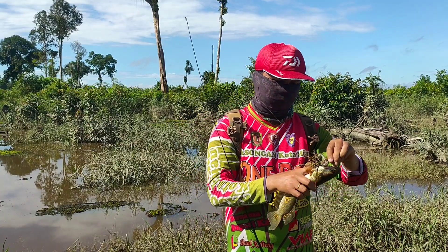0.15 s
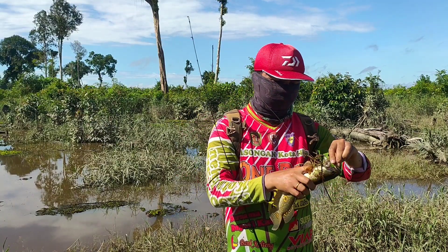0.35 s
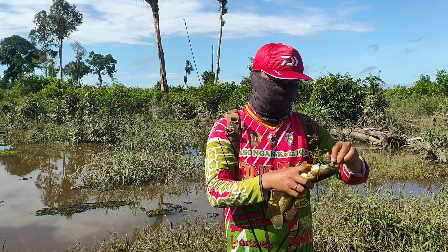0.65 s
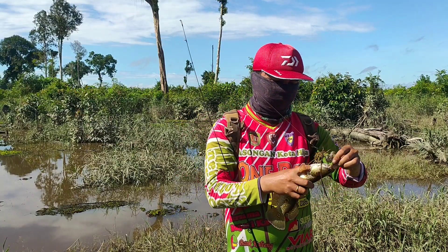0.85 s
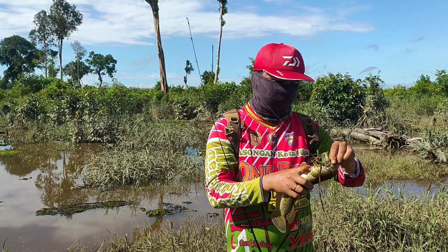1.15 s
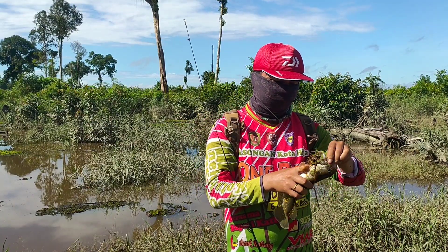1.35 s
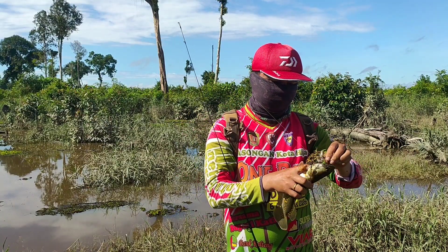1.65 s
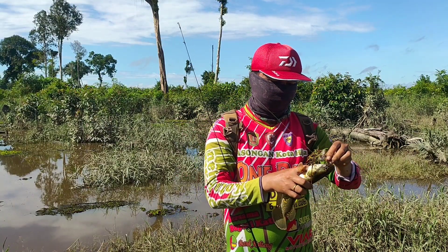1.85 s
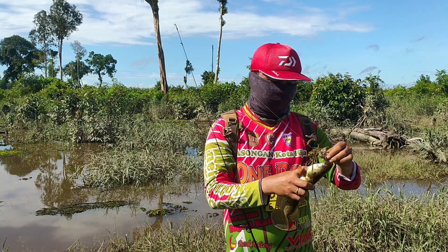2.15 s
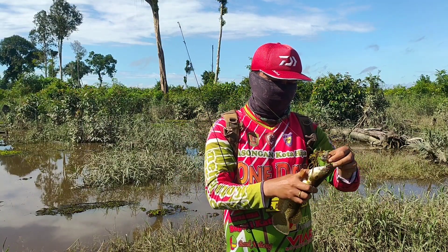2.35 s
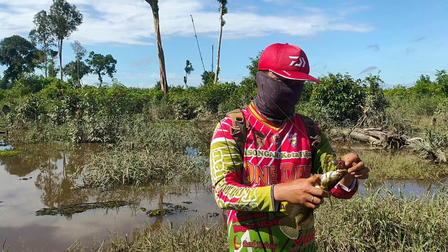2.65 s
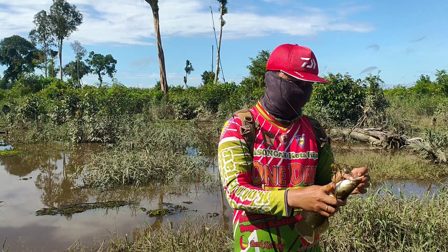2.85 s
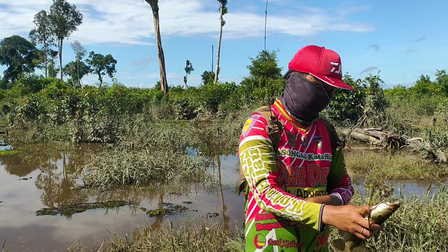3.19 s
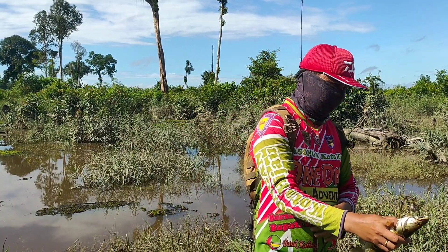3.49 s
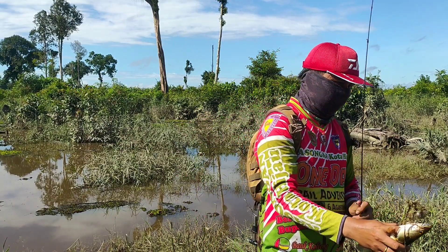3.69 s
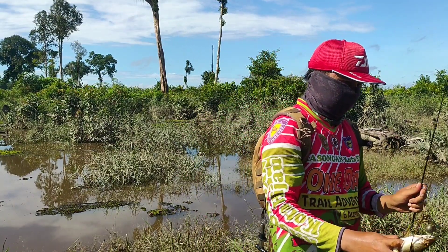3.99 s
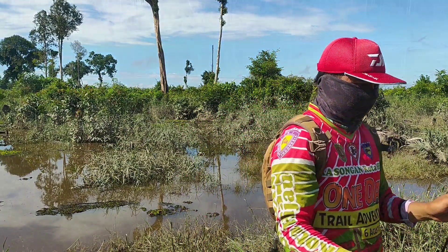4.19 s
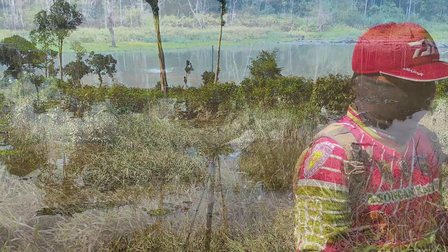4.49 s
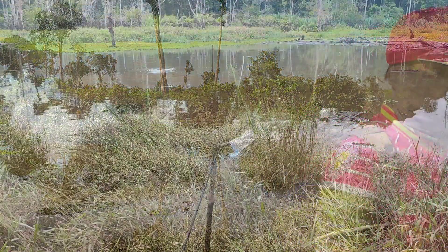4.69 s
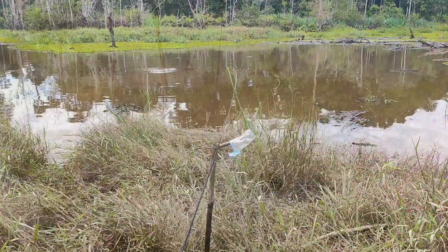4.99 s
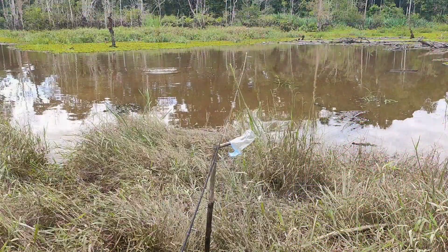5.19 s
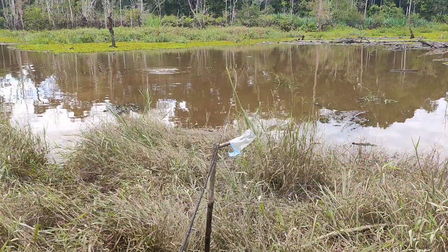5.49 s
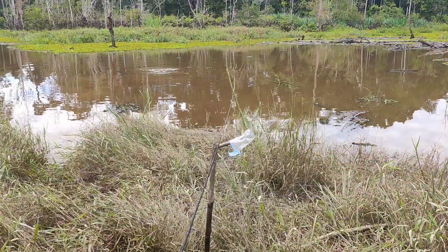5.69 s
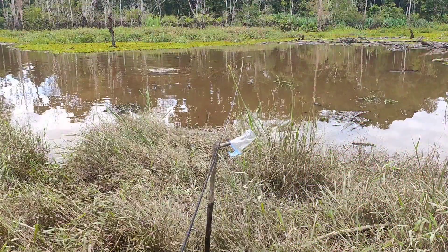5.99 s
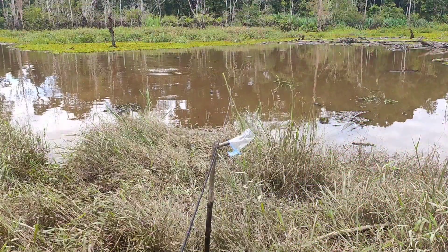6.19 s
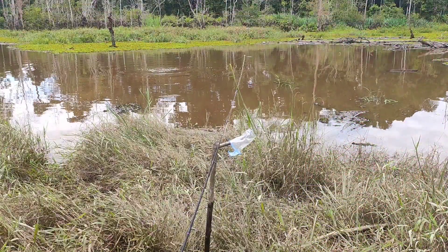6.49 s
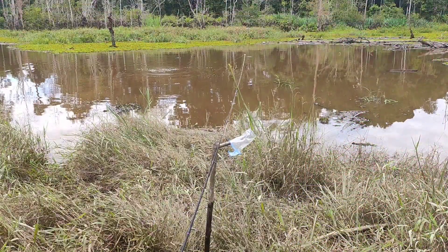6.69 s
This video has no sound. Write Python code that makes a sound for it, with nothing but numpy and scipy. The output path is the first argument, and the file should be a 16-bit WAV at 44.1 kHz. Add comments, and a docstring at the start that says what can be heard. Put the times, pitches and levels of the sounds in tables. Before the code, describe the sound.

A wide outdoor stereo pickup at a pond edge: fast high insect trills, throbbing low machine drone, light wind and soft clothing movement. Far birds whistle, some hoarse. Past the middle, dry grass swishes close by, with a short creak and a cluster of woody knocks and cracks. The rumble weakens, the grass insects give way to pulsing pond crickets, and a bird chips quickly close by as a small motor grows at the end.

```python
"""Swamp edge by day: machinery rumbles in beats while crickets and a katydid, resonant wings driven in strokes,
sing over rustling cloth and leaves; far birds whistle as wavering, partly hoarse tones. Then twigs snap as
decaying knocks and cracks, someone brushes through hissing grass, and a strap creaks by stick and slip.
A near bird then chips in falling tones echoed by water, bank and trunks. Pond crickets replace the grass
singers, and a small engine, firing impulses through a resonant pipe, draws closer."""
import sys
import numpy as np
from scipy import signal
from scipy.fft import rfft, irfft, next_fast_len
from scipy.io import wavfile
from scipy.ndimage import uniform_filter1d, map_coordinates

SR = 44100
rng = np.random.default_rng(int(sys.argv[2]) if len(sys.argv) > 2 else 0)


def store_pcm(level_fs):
    """Save levels as 16-bit WAV."""
    pcm = np.round(np.clip(level_fs, -1, 1) * 32767).astype(np.int16)
    wavfile.write(sys.argv[1], SR, np.atleast_2d(pcm).T)


N = 301864
TIME = np.arange(N) / SR


def amp(db):
    """Level law: decibels to an amplitude ratio."""
    return 10 ** (np.asarray(db) / 20)


def unit(x):
    """Normalization to an rms of 1."""
    return x / np.sqrt(np.mean(x ** 2, axis=-1, keepdims=True) + 1e-20)


def along(points, hz):
    """Interpolation of (Hz, value) points on a logarithmic frequency axis."""
    f, v = np.transpose(points)
    return np.interp(np.log(hz + 1), np.log(f + 1), v)


def spectrum(points):
    """Spectral shaping: a gain for every frequency, from (Hz, dB) points."""
    return lambda hz: amp(along(points, hz))


def levels(rows):
    """Envelope interpolation: one dB curve per column, -120 dB outside the table."""
    s, *cols = np.transpose(rows)
    return [np.interp(TIME, s, c, left=-120, right=-120) for c in cols]


def gains(rows):
    """Envelope interpolation, as amplitude ratios."""
    return [amp(c) for c in levels(rows)]


def wobble(rate):
    """Slow random modulation: a smooth curve with rate knots a second."""
    return map_coordinates(rng.standard_normal(int(N * rate / SR) + 4), [TIME * rate])


def filtered(x, response):
    """Linear filtering: the spectrum of x times a response of frequency."""
    m = next_fast_len(N + SR // 2)
    return irfft(rfft(x, m) * response(np.fft.rfftfreq(m, 1 / SR)), m)[..., :N]


def band(hz, width_hz):
    """Resonance: a steep bell around hz."""
    return lambda f: 1 / (1 + ((f - hz) / width_hz) ** 2) ** 2


def noise(response, alike, patchy_db=0):
    """Interchannel coherence: stereo noise of rms 1 with a set left-right likeness and random patches."""
    z = signal.stft(rng.standard_normal((2, N)), nperseg=512)[2]
    field = rng.standard_normal(z.shape[1:])
    field = uniform_filter1d(uniform_filter1d(field, 6, 0), 10, 1)
    patches = amp(patchy_db * field / field.std())
    mid, side = filtered(signal.istft(z * patches, nperseg=512)[1][:, :N], response)
    turn = np.arccos(np.clip(alike, -1, 1)) / 2
    mid, side = np.cos(turn) * mid, np.sin(turn) * side
    return unit(np.array([mid + side, mid - side]))


def panned(db):
    """Interchannel level difference: left over right in dB."""
    return amp([[db / 2], [-db / 2]])


def tone(hz, lead=0):
    """Phase integration: a sine that follows a frequency curve, lead radians ahead."""
    return np.sin(2 * np.pi * np.cumsum(hz) / SR + lead)


RISE_DB_PER_S, SAG_DB_PER_S, FALL_DB_PER_S = 219, 3.5, 287


def stroke(start, length, edge=1):
    """Gesture envelope: exponential rise, slow sag and fall; edge steepens the rise and fall."""
    since = TIME - start
    rise_db = edge * RISE_DB_PER_S * np.minimum(since, 0)
    sag_db = SAG_DB_PER_S * np.clip(since, 0, length)
    fall_db = edge * FALL_DB_PER_S * np.maximum(since - length, 0)
    return amp(rise_db - sag_db - fall_db)


# Decay of echoes among the trunks. Each row: frequency in Hz, 60 dB decay time in seconds.
TREE_DECAY = [(500, 0.11), (1100, 0.3), (1500, 0.42), (2500, 0.61), (6000, 0.41), (12000, 0.012)]


def trees(x, openness=1):
    """Diffuse reverberation: trunk echoes build up, then decay by frequency, faster in open ground."""
    hz, t, z = signal.stft(rng.standard_normal((2, SR // 2)), SR, nperseg=256)
    build_up = 1 - 0.39 * np.exp(-t / 0.027)
    decay = amp(-60 * openness * t / along(TREE_DECAY, hz)[:, None])
    tail = signal.istft(z * build_up * decay, SR, nperseg=256)[1]
    delayed = np.pad(x, (200, 0))[None]  # delay in samples
    return signal.fftconvolve(delayed, tail / np.linalg.norm(tail[0]), axes=1)[:, :N]


# Spectrum of a faint steady hiss. Each row: frequency in Hz, relative density in dB per Hz.
QUIET_SPECTRUM = [(200, -43.5), (500, 15.5), (1000, 13), (3500, -29), (6000, -10), (10000, -23),
                  (12000, 8.5), (14000, 8.5), (15500, 10), (17000, -0.5)]


def quiet_hiss():
    """Stationary noise: a faint, patchy hiss independent at left and right."""
    return amp(-81.5) * noise(spectrum(QUIET_SPECTRUM), alike=0, patchy_db=8.5)


# Far machinery. Each row: time in seconds, drone level in dB, body level in dB, hum level in dB,
# strength of the second, lower drone from 0 to 1.
MACHINERY_LEVELS = [(0, -45, -36, -51.5, 0.25), (.7, -44.5, -46, -54, 0.47), (1.0, -48, -43, -51, 0.16),
                    (1.3, -43.5, -46, -58, 0.066), (1.85, -49, -44.5, -51, 0.17),
                    (2.05, -44, -40, -49.5, 0.26), (2.7, -48.5, -43, -50.5, 0.22),
                    (3.0, -44, -44, -55, 0.12), (3.55, -45.5, -50.5, -63, 0.21),
                    (3.8, -43, -41.5, -49, 0.27), (4.2, -39.5, -41, -55, 0.49), (4.6, -49, -46.5, -54, 0.6),
                    (5.1, -50.5, -54, -67.5, 0.84), (5.4, -50, -58.5, -82, 0.96),
                    (5.75, -55, -61, -89, 0.81), (6.1, -53.5, -56, -81, 0.76),
                    (6.84, -53.5, -64.5, -77.5, 0.91)]
# Spectrum of the low body. Each row: frequency in Hz, relative density in dB per Hz.
BODY_SPECTRUM = [(53, -13), (90, 2), (119, -0.5), (173, -6), (207, -22.5), (226, -12.5), (261, -17),
                 (290, -23), (450, -46), (580, -50.5), (990, -120)]
BEAT_HZ, BEAT_NULL_S = 5.5, 5.01  # beat rate; a moment at which the drones oppose each other


def rumble():
    """Beating: two wavering drones interfere, over broad low noise and a narrow-band hum."""
    drone_db, body_db, hum_db, second = levels(MACHINERY_LEVELS)
    second = np.clip(second, 0, 1)
    direction = 0.38 * wobble(2.1) * [[1], [-1]]  # left-right phase drifts
    phase = 2 * np.pi * np.cumsum(79.3 + 3 * wobble(12)) / SR + direction
    beat = 2 * np.pi * BEAT_HZ * (TIME - BEAT_NULL_S)
    pair = np.sin(phase) - second * np.sin(phase - beat)
    pair = pair * np.abs(1 - second * np.cos(beat)) ** 0.24  # the beats peak sharply
    drone = unit(pair * amp(3.6 * wobble(11)) + 0.075 * noise(band(75.7, 18), alike=0.065))
    out = amp(drone_db) * drone
    out += amp(body_db) * noise(spectrum(BODY_SPECTRUM), alike=0.94, patchy_db=1.5)
    return out + amp(hum_db) * noise(band(200.9, 12.0), alike=0.74)


WIND_DB = -60


def wind():
    """Turbulence: gusty low noise, nearly incoherent between left and right."""
    return amp(WIND_DB + 6.2 * wobble(2.84)) * noise(band(36, 31), alike=0.056)


# Low knocks. Each row: start in seconds, level in dB, frequency in Hz, left over right in dB.
LOW_KNOCKS = [(0.92, -40, 58.3, 13), (1.887, -29, 71, 11), (1.98, -28.5, 95, 9), (3.65, -25.5, 79.4, -14.5)]


def thumps():
    """Damped impact: each low knock is one push and its rebound."""
    out, t = np.zeros((2, N)), TIME[:SR // 20]
    for s, db, hz, pan_db in LOW_KNOCKS:
        push = np.sin(2 * np.pi * hz * t) * np.exp(-((t * hz - .6) / 0.62) ** 2)
        out[:, round(s * SR):][:, :len(t)] += amp(db) * push * panned(pan_db)
    return out


# Far birds. Each row: start in seconds, end in seconds, start frequency in Hz, end frequency in Hz,
# relative level in dB, random frequency deviation (hoarseness) in Hz.
FAR_WHISTLES = [(.74, 1.4, 4570, 4580, -76, 70), (1.0, 1.17, 4620, 4580, -80, 60),
                (1.18, 1.33, 4400, 4200, -81, 200), (.878, .925, 2050, 1900, -67, 70),
                (1.152, 1.192, 4900, 2300, -63, 110), (1.224, 1.233, 3900, 3150, -67, 20),
                (.645, .665, 2200, 2150, -78, 40), (1.7, 2.0, 2780, 2720, -73, 90),
                (1.51, 1.6, 3000, 2980, -65, 40), (1.52, 1.72, 2880, 2700, -64, 60),
                (1.71, 1.83, 3450, 3050, -73, 120), (1.79, 1.99, 2930, 2880, -61, 25),
                (1.99, 2.12, 2900, 2950, -68, 40), (1.74, 2.08, 3230, 3200, -68, 200),
                (2.05, 2.55, 3330, 3300, -67, 280), (2.15, 2.6, 2950, 2850, -70, 200),
                (2.01, 2.35, 2640, 2640, -59, 35), (2.12, 2.175, 3100, 2700, -61, 30),
                (2.44, 2.6, 2480, 2450, -72, 40), (2.315, 2.395, 3680, 2470, -58, 20),
                (2.385, 2.44, 2460, 2450, -61, 20), (2.52, 2.585, 2350, 1950, -68, 60),
                (2.15, 2.55, 4200, 4900, -82, 150), (1.75, 2.05, 5050, 5350, -83, 150),
                (1.5, 1.7, 4100, 4600, -83, 150), (2.08, 2.12, 1100, 1080, -73, 20),
                (2.33, 2.42, 1090, 1080, -71, 15), (2.63, 2.74, 1090, 1080, -77, 25),
                (2.88, 2.895, 2700, 2000, -68, 40), (2.896, 2.901, 5800, 3600, -66, 200),
                (3.012, 3.022, 2500, 2200, -64, 40), (3.443, 3.485, 2300, 2310, -61, 30),
                (3.49, 3.522, 2320, 2340, -63, 30), (3.628, 3.65, 2120, 2330, -62, 20),
                (.15, .55, 3850, 3750, -84, 160), (.62, .97, 3880, 3800, -85, 120),
                (.25, .62, 5400, 5100, -84, 170), (.99, 1.12, 3550, 3450, -82, 120),
                (3.82, 3.865, 4800, 4100, -60, 30), (4.783, 4.825, 5450, 4850, -62, 10)]
QUICK_S, QUICK_ECHO_DB = .05, -5  # shorter notes come from nearer and carry less echo
EDGE_S, DRAWN_S = .03, .35  # longest edge of a short note; a longer, drawn note swells slowly


def far_birds():
    """Frequency modulation: unsteady, partly hoarse whistles with a ground reflection and echoes."""
    dry, echoed = np.zeros(N), np.zeros(N)
    for start, end, start_hz, end_hz, db, hoarse_hz in FAR_WHISTLES:
        n = max(round((end - start) * SR), 64)
        i = round(start * SR)
        hz = np.geomspace(start_hz, end_hz, n) + hoarse_hz * wobble(150)[:n]
        taper = min(2 / 3, 2 * EDGE_S * SR / n) if n < DRAWN_S * SR else .8  # share of the note
        note = amp(db + 8 + 2 * wobble(40)[:n]) * signal.windows.tukey(n, taper) * tone(hz)
        dry[i:i + n] += note
        echoed[i:i + n] += note * amp(QUICK_ECHO_DB if end - start < QUICK_S else 0)
    direct = dry + amp(-9) * np.roll(dry, round(.0018 * SR))  # ground bounce
    return amp(-3) * direct * panned(1) + amp(-4) * trees(echoed, openness=1.3)


# Spectra of cloth, leaves, stalks and blades. Each row: frequency in Hz, relative density in dB per Hz.
CLOTH_SPECTRUM = [(250, -5.5), (400, -6.5), (600, -5), (900, -8.5), (1400, -59)]
LEAF_SPECTRUM = [(600, -34), (1000, 4), (1300, 2.5), (1800, 2), (2600, -0.5), (3300, -65)]
STALK_SPECTRUM = [(1800, -13), (2700, 8.5), (3200, 9.5), (4000, -0.5), (5200, 7.5), (6000, 9.5),
                  (7000, -96)]
BLADE_SPECTRUM = [(3500, -50), (5000, 4), (6500, 17), (8500, 29), (10500, 28), (13000, 23), (15000, 29.5),
                  (16500, -56)]
# Soft underlying rustle. Each row: time in seconds, cloth level in dB.
STIR_LEVELS = [(0, -60), (.3, -71), (.7, -78), (1.35, -80), (1.6, -69.5), (1.82, -83), (1.95, -61),
               (2.35, -64), (2.6, -75), (3, -72), (3.55, -83.5), (5.4, -60.5), (5.62, -100), (5.9, -73.5),
               (6.3, -79.5), (6.84, -68.5)]
STIR_LEAVES_DB, STIR_STALKS_DB = -0.5, -76.5  # leaves over the cloth; steady stalks
# Brushes through the grass. Each row: start in seconds, length in seconds, then the starting levels
# of blades, cloth, leaves and stalks in dB.
GRASS_BRUSHES = [(3.362, 0.17, -57.5, -72.5, -71, -60.5), (3.703, 0.1, -48, -53.5, -52.5, -50.5),
                 (3.841, 0.18, -44.5, -48.5, -49, -48.5), (4.064, 0.14, -47, -53, -51.5, -51.5),
                 (4.272, 0.071, -51.5, -54, -54.5, -47.5), (4.374, 0.23, -51.5, -55.5, -55, -55),
                 (4.453, 0.034, -75, -56, -50.5, -57), (4.625, 0.15, -61, -64.5, -65, -58),
                 (4.871, 0.24, -50.5, -53, -57.5, -52), (5.25, 0.31, -50, -120, -98, -57.5),
                 (5.593, 0.14, -64, -76, -75, -69), (5.892, 0.096, -54.5, -102, -97, -76),
                 (6.096, 0.024, -43, -100, -72, -46.5), (6.208, 0.0067, -61, -73, -87, -69),
                 (6.767, .1, -59, -58, -82, -57)]


def rustle():
    """Friction noise: cloth, leaves and stalks rub softly; grass blades hiss with spiky grains."""
    gestures = (amp(dbs)[:, None] * stroke(s, length) for s, length, *dbs in GRASS_BRUSHES)
    blades, cloth, leaves, stalks = sum(gestures)
    stir, = gains(STIR_LEVELS)
    cloth_noise = noise(spectrum(CLOTH_SPECTRUM), alike=0.34, patchy_db=4.0)
    out = (cloth + stir) * cloth_noise * amp(1.56 * wobble(60))
    leaf_noise = noise(spectrum(LEAF_SPECTRUM), alike=0.082, patchy_db=3.5)
    out += (leaves + stir * amp(STIR_LEAVES_DB)) * leaf_noise * amp(1.2 * wobble(80))
    out += (stalks + amp(STIR_STALKS_DB)) * noise(spectrum(STALK_SPECTRUM), alike=0, patchy_db=3)
    struck = rng.random((2, N)) < 200 / SR  # 200 grains a second on average
    grain_db = np.minimum(4 * rng.exponential(size=(2, N)), 18)
    grains = struck * amp(grain_db) * rng.choice([-1, 1], (2, N))
    grains = unit(filtered(grains, spectrum(BLADE_SPECTRUM)))
    hiss = noise(spectrum(BLADE_SPECTRUM), alike=0, patchy_db=2.5) + 0.38 * grains
    return out + blades * amp(1.1 * wobble(23) + 1.2 * wobble(90)) * hiss


# Twigs and tackle. Each row: time in seconds (2 ms before the onset), knock level in dB,
# knock frequency in Hz, crack level in dB.
TWIG_SNAPS = [(2.894, -65, 355, -74), (4.294, -35, 750, -47), (4.3267, -27, 1390, -31.5),
              (4.348, -49, 353, -45), (4.3735, -29.5, 1260, -28), (4.393, -27.5, 1150, -49),
              (4.419, -45, 396, -54.5), (4.444, -30, 810, -46), (4.461, -32, 455, -49.5),
              (4.483, -35.5, 433, -54), (4.489, -50, 536, -52), (4.503, -33, 520, -51),
              (4.515, -44, 544, -47), (4.634, -47, 560, -34), (4.878, -38, 670, -37),
              (5.047, -35.5, 606, -48), (5.7, -78, 1580, -54), (6.038, -60, 1730, -59),
              (6.06, -61, 1700, -51), (6.115, -62, 1760, -35.5), (6.121, -61, 1800, -31)]


def snaps():
    """Impulsive excitation: a bright noise crack and a duller ringing knock, panned by chance."""
    out, t = np.zeros((2, N)), TIME[:SR // 25]
    for s, knock_db, knock_hz, crack_db in TWIG_SNAPS:
        knock = amp(knock_db - 60 * t / .008) * np.sin(2 * np.pi * knock_hz * t)
        # a bright crack, strongest near 12 kHz
        burst = np.convolve(rng.standard_normal(len(t)), [0.87, 0.41, -1, 0.25], "same")
        crack = amp(crack_db - 60 * t / 0.0032) * burst
        out[:, round((s + .002) * SR):][:, :len(t)] += (knock + crack) * panned(rng.normal(1.5, 3))
    return out


# first slip, first gap, how fast the gaps close up, number of slips
CREAK_S, CREAK_GAP_S, CREAK_QUICKENS_S, CREAK_SLIPS = 3.862, .0105, .00027, 9
CREAK_PEAK_S, CREAK_DB, CREAK_SWELL_S, CREAK_HZ, CREAK_T60_S = 3.912, -35, 0.024, 1050, 0.018


def creak():
    """Stick-slip: a strap under load slips faster and faster; each slip rings a short resonance."""
    out, t = np.zeros(N), TIME[:SR // 25]
    for k in range(CREAK_SLIPS):
        s = CREAK_S + CREAK_GAP_S * k - CREAK_QUICKENS_S * k * k
        off_peak = ((s - CREAK_PEAK_S) / CREAK_SWELL_S) ** 2
        db = CREAK_DB - 6 * off_peak / (1 + off_peak) + rng.normal(0, 1)
        ring = np.sin(2 * np.pi * CREAK_HZ * rng.normal(1, 0.15) * t)
        out[round(s * SR):][:len(t)] += amp(db - 60 * t / CREAK_T60_S) * ring
    return out


# Approach of the engine. Each row: time in seconds, level in dB.
ENGINE_LEVELS = [(5.95, -101), (6.05, -68), (6.3, -61.5), (6.67, -50), (6.84, -52)]
# Exhaust pipe response. Each row: frequency in Hz, relative gain in dB.
PIPE_RESPONSE = [(220, -41), (300, -1.5), (330, -3), (374, 13), (420, -5), (470, 4.5), (510, 9.5),
                 (580, -33), (660, -7), (800, -30), (1200, -43), (3000, -120)]
# from afar mostly one line carries; the full pipe opens up around NEAR_S
DISTANT_HZ, NEAR_S, TURN_S = 411, 6.34, 0.049


def engine():
    """Source and filter: uneven firings through a pipe give fuzzy lines 46.6 Hz apart, on exhaust roar."""
    turns = np.cumsum(46.6 * (1 + 0.0119 * wobble(6))) / SR
    firings = np.diff(np.floor(turns), prepend=0) * amp(3.0 * wobble(40))
    pipe = spectrum(PIPE_RESPONSE)
    near = unit(unit(filtered(firings, pipe)) + .7 * noise(pipe, alike=0.15))
    far_line = unit(filtered(firings, band(DISTANT_HZ, 30)))
    far = unit(far_line + 1.1 * noise(band(DISTANT_HZ, 110), alike=.2))
    share = 1 / (1 + np.exp((NEAR_S - TIME) / TURN_S))
    return gains(ENGINE_LEVELS)[0] * (share * near + (1 - share) * far)


PAIR_S = 3.1765  # reference moment of the stroke count


def insects(singers, loudness):
    """Driven resonance: strokes ring a wing in pulses and phrases; far neighbours merge into a blur."""
    out = np.zeros((2, N))
    for (hz, width_hz, rate, sharp, phrase, depth_db, pan_db, blur), gain in zip(singers, loudness):
        # blurred singers keep time less well
        strokes = 2 + rate * (TIME - PAIR_S) + .6 * blur ** 2 * wobble(3)
        breath = (strokes - .5) * phrase / rate  # a phrase counts its strokes and opens on a pause
        phrase_db = -depth_db * np.cos(2 * np.pi * breath) + 5.5 * blur * wobble(70)
        gate = np.abs(np.sin(np.pi * strokes)) ** abs(sharp) * amp(phrase_db)
        wing_hz = hz + 0.6 * blur * width_hz * wobble(150)
        wing = tone(wing_hz, lead=np.array([[.8], [-.8]]))  # left leads in phase
        neighbours = noise(band(hz, 1.05 * width_hz), alike=0, patchy_db=3) * amp(2 * wobble(40))
        song = (1 - np.clip(blur, 0, 1)) * unit(gate * wing) + blur * neighbours
        out += gain * unit(filtered(song, band(hz, 3 * width_hz))) * panned(pan_db)
    return out


# Pond singers. Each row: wing frequency in Hz, width in Hz, pulses a second, pulse sharpness (exponent),
# phrases a second, phrase swing either way in dB, left over right in dB, blur from 0 to 1.
POND_SINGERS = [(5590, 65, 21.5, .6, 7.6, 2, 0, .25), (6450, 200, 70, 2.5, 17.5, 5, 4, .35),
                (8600, 260, 75, 2, 6, 2, -6, .4), (7850, 160, 90, 1, 6, 2, -3, .4),
                (7800, 900, 120, .4, 3, 2, -3, 1)]
# Steady level in dB, one for each pond singer.
POND_STEADY_LEVELS = [-77.5, -70.5, -69.5, -88, -67.5]
# Louder bouts, one list for each pond singer. Each row: start in seconds, length in seconds, level in dB.
POND_BOUTS = [
    [(5.11, 0.12, -61), (5.3, 0.31, -60), (5.6, 0.31, -66), (5.96, 0.29, -59.5), (6.25, 0.83, -63.5)],
    [(5.82, 0.13, -66.5), (5.985, 0.42, -56), (6.4, 0.094, -70)],
    [(5.29, 0.07, -48), (5.427, 0.018, -50.5), (5.5, 0.016, -54), (5.685, 0.033, -55), (5.862, 0.029, -57),
     (6.036, 0.013, -47.5), (6.1, .06, -52), (6.2, 0.011, -62), (6.4, 0.066, -71), (6.545, 0.013, -69),
     (6.68, 0.029, -53), (6.826, 0.012, -49)],
    [(5.413, 0.023, -57), (5.5, 0.043, -71), (5.96, 0.039, -63), (6.06, .045, -76), (6.21, 0.018, -66),
     (6.308, 0.02, -61)],
    [],
]
POND_START_S, POND_FADE_S = 5.1, .3
BOUT_EDGE = 4  # a bout starts and stops this many times faster than a brush


def pond_insects():
    """Superposition: steady singers fade in, most of which get louder in bouts."""
    fade = np.clip((TIME - POND_START_S) / POND_FADE_S, 0, 1)
    loudness = []
    for steady_db, bouts in zip(POND_STEADY_LEVELS, POND_BOUTS):
        swells = sum(amp(db) * stroke(s, length, BOUT_EDGE) for s, length, db in bouts)
        loudness.append(amp(steady_db) * fade + swells)
    return insects(POND_SINGERS, loudness)


# phrases a second, strokes a phrase, the end of one phrase
KATYDID_PHRASES, KATYDID_STROKES, KATYDID_END_S = 8.6, 15, 2.122
# rise within a phrase; how strongly it follows the chorus level curve
KATYDID_SWELL_DB, KATYDID_FOLLOWS = 4.5, 0.62
# Katydid wings. Each row: start frequency in Hz, end frequency in Hz,
# level in dB when the chorus curve is at -56.5 dB, left over right in dB.
KATYDID_RESONANCES = [(8700, 9250, -65, 0.5)]


def katydid(chorus_db):
    """Amplitude modulation: quick wing strokes in phrases that rise in pitch and level and stop short."""
    phrases = KATYDID_PHRASES * (TIME - KATYDID_END_S) + .04 * wobble(2)
    part = phrases % 1
    swell = amp(KATYDID_SWELL_DB * part) * np.clip((1 - part) / 0.11, 0, 1)
    out = np.zeros((2, N))
    for start_hz, end_hz, db, pan_db in KATYDID_RESONANCES:
        gate = swell * np.sin(np.pi * KATYDID_STROKES * phrases) ** 2 * amp(2.1 * wobble(90))
        wing_hz = start_hz + (end_hz - start_hz) * part + 120 * wobble(130)
        wing = tone(wing_hz, lead=np.array([[.8], [-.8]]))
        out += amp(db) * unit(gate * wing) * panned(pan_db)
    return out * amp(KATYDID_FOLLOWS * (chorus_db + 56.5)) * (chorus_db > -100)


# Grass singers, nearest first. Each row: wing frequency in Hz, width in Hz, pulses a second,
# pulse sharpness (exponent), phrases a second, phrase swing either way in dB, left over right in dB,
# blur from 0 to 1.
GRASS_SINGERS = [(8280, 340, 79.2, 2.2, 26.4, 6.5, -20, .52), (9000, 400, 132, 1, 8.6, 1, -1, 1),
                 (7280, 330, 125, 1.4, 8.6, 2, 12, .7), (6600, 380, 67, 1.5, 8, 3, 7, .7),
                 (7760, 260, 165, 1.4, 8, 2, 9, .7)]
# Each row: time in seconds, nearest cricket level in dB, chorus level in dB.
CHORUS_LEVELS = [(0, -57, -47.5), (.57, -59, -60), (.88, -71.5, -66), (.98, -57.5, -60.5),
                 (1.4, -69.5, -71.5), (1.52, -56.5, -57), (1.86, -61, -62.5), (1.95, -56, -51),
                 (2.2, -54.5, -49.5), (2.74, -56, -56.5), (3.04, -55, -55), (3.2, -56, -71),
                 (3.6, -62, -63.5), (3.7, -56.5, -50.5), (3.91, -50.5, -43.5), (4.45, -52.5, -49),
                 (4.8, -64.5, -54), (5.0, -59, -48), (5.2, -68, -61), (5.4, -82, -55), (5.6, -90, -97)]
# Other grass singers. Each row: level in dB when the chorus curve is at -57 dB,
# how strongly it follows that curve.
OTHER_SINGERS = [(-62, 0.37), (-63.5, 1), (-58, 0.9), (-63, 0.89)]


def grass_insects():
    """Shared envelope: the nearest cricket has its own level curve; the others follow one chorus level curve."""
    near_db, chorus_db = levels(CHORUS_LEVELS)
    loudness = [amp(near_db)]
    for db, follows in OTHER_SINGERS:
        loudness.append(amp(db + follows * (chorus_db + 57.0)) * (chorus_db > -100))
    return insects(GRASS_SINGERS, loudness) + katydid(chorus_db)


# Near bird. Each row: time of the fall in seconds, relative level in dB, top frequency in Hz,
# bottom frequency in Hz, added level at the low end in dB.
BIRD_CHIPS = [(4.552, -44, 2600, 1610, 6), (4.604, -43, 2600, 1730, 3), (4.631, -43, 2400, 1660, -7),
              (4.709, -41, 2620, 1632, 6.5), (4.759, -37, 2480, 1750, 1.5), (5.088, -43, 2600, 1410, 0),
              (5.133, -36, 2600, 1385, -2), (5.22, -32.5, 2650, 1374, -4), (5.24, -38.5, 1500, 1085, 0.5),
              (5.263, -27, 2480, 1648, 0.5), (5.378, -34.5, 2700, 1573, 3), (5.428, -30, 2480, 1765, -8.5),
              (5.709, -39.5, 1800, 1090, 3.5), (5.728, -32, 2600, 1480, -3), (5.774, -30, 2650, 1430, -3),
              (5.859, -26.5, 2600, 1468, -7), (5.902, -23, 2450, 1642, -3.5), (5.964, -33, 2600, 1650, 2),
              (6.071, -32, 2600, 1647, 0.5), (6.119, -31, 2400, 1767, -4.5), (6.371, -34.5, 2600, 1404, -3),
              (6.414, -31.5, 2600, 1445, -1.5), (6.503, -30, 2600, 1486, -1.5),
              (6.546, -25.5, 2400, 1557, -2.5), (6.577, -35.5, 2680, 1645, 6.5),
              (6.631, -32.5, 2600, 1642, 4.5), (6.736, -32.5, 2620, 1648, 5.5),
              (6.783, -29, 2350, 1805, -2)]
# Vocal tract response. Each row: frequency in Hz, gain in dB.
THROAT_RESPONSE = [(1000, -9), (1500, -8), (1700, -6.5), (1950, -9), (2200, 2.5), (2330, 0), (2450, -7),
                   (2600, -3)]
# How long the bottom note lasts. Each row: bottom frequency in Hz, time after the fall in seconds.
BOTTOM_HOLD = [(1090, .045), (1400, .016), (1500, .012), (1650, .018), (1800, .022)]
# a chip that starts above HIGH_HZ holds its top longer
HIGH_HZ, HIGH_HOLD_S, LOWER_HOLD_S = 2520, .0135, .0075


def near_bird():
    """Filtered glide: a pure tone drops through the throat's response; delayed reflections comb it."""
    dry, u = np.zeros(N + SR), TIME[:SR // 8] - .03  # u: seconds from the middle of the fall
    for s, db, top_hz, bottom_hz, end_db in BIRD_CHIPS:
        low = bottom_hz < 1200  # a low note glides in slowly
        before = HIGH_HOLD_S if top_hz > HIGH_HZ else LOWER_HOLD_S * (1.5 if low else 1)
        after = along(BOTTOM_HOLD, bottom_hz)
        hz = bottom_hz + (top_hz - bottom_hz) / (1 + np.exp(u / (.003 if low else .0015)))
        fallen = (top_hz - hz) / (top_hz - bottom_hz)
        throat = amp(along(THROAT_RESPONSE, hz) + end_db * fallen ** 2)
        shape = np.clip((u + before) / 0.0077, 0, 1) * np.clip((after - u) / 0.007, 0, 1) * throat
        dry[round((s - .031) * SR):][:len(u)] += amp(db) * shape * tone(hz)
    dry = dry[:N]
    pond = np.roll(dry, round(.0027 * SR))  # the bounce off the water cuts each fall into lobes
    bank = np.array([np.roll(dry, round(.0098 * SR)), np.roll(dry, round(.0107 * SR))])
    direct = dry + amp(-3) * pond
    return amp(-1.5) * (direct + amp(-4.5) * bank + amp(-5.0) * trees(dry))


def scene():
    """Superposition of all sources."""
    background = quiet_hiss() + rumble() + wind() + thumps() + far_birds()
    movement = rustle() + snaps() + creak()
    return background + movement + engine() + pond_insects() + grass_insects() + near_bird()


TOP_HZ = 15725


def record(dry):
    """Band limitation: nothing passes from TOP_HZ upward."""
    return filtered(dry, lambda hz: hz < TOP_HZ)


dry = scene()
out = record(dry)
store_pcm(out)
```